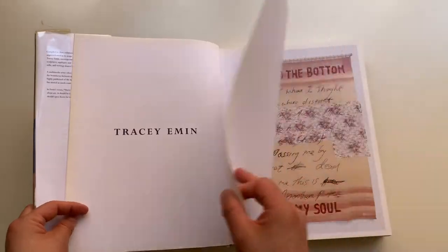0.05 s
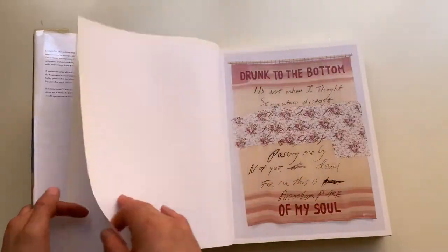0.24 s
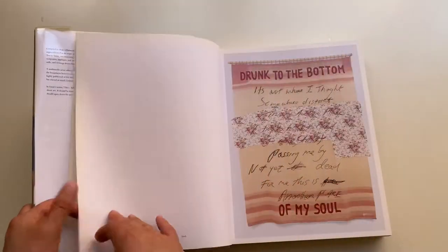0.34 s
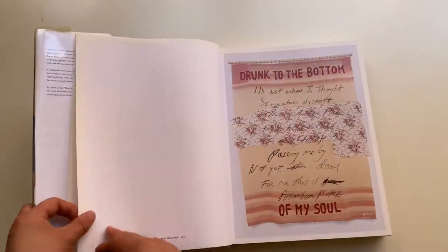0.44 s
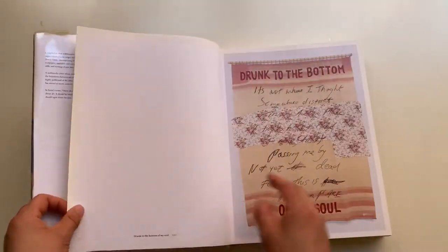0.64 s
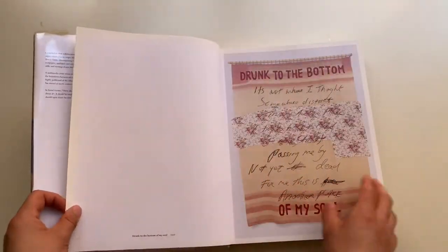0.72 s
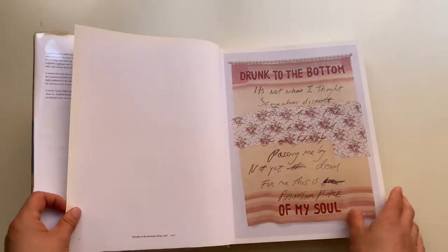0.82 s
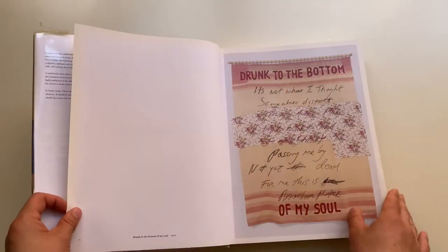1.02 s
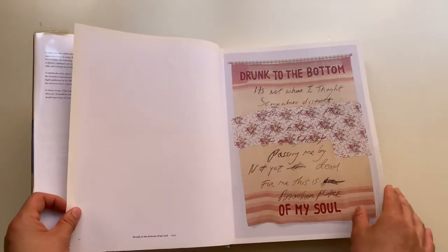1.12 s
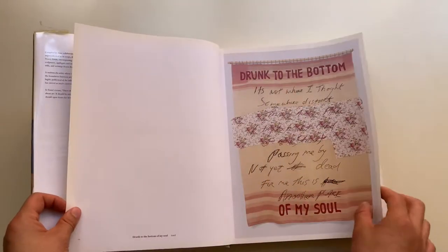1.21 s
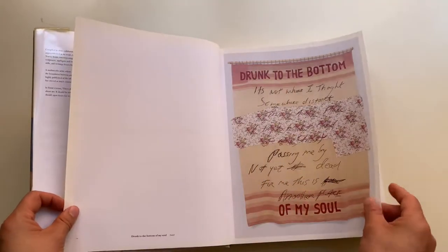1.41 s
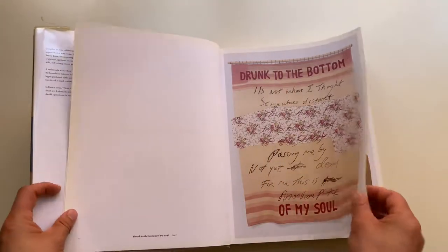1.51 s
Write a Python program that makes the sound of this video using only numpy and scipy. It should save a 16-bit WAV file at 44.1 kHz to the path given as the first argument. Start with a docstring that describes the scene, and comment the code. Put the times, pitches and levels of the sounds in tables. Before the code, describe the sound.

Page turn in a quiet room: sheet buckles, rustles over, then fingers pick at the next page

```python
"""A hand turns a large stiff page of a book in a quiet room, close to a mid-side microphone pair.
First faint sliding with a few ticks, then the sheet buckles with a hollow flop (swelling rings) at 0.2 s.
It slides and crackles on (grainy noise), ticks and thuds at 0.6 s, and fades to near silence.
From 1.27 s fingers pick at the next page: ticks, brushing treble and narrow rasps.
Throughout, filtered noise makes a low lumpy rumble, a wavering hum and a faint hiss."""
import sys
import numpy as np
from scipy import signal
from scipy.fft import rfft, irfft, next_fast_len
from scipy.io import wavfile
from scipy.ndimage import uniform_filter1d, map_coordinates

SR = 44100
rng = np.random.default_rng(int(sys.argv[2]) if len(sys.argv) > 2 else 0)


def field_ratio(decibels):
    """Amplitude ratio for a level in dB (20 dB per decade); scalars and array-likes work."""
    return 10 ** (np.asarray(decibels, dtype=float) / 20)


def inscribe(sig):
    """Save sig as 16-bit PCM at rate SR to the path in sys.argv[1].

    A 1-D sig is mono; a 2-D sig holds one channel per row.
    Samples are clipped to [-1, 1] before scaling.
    """
    pcm = np.round(np.clip(np.atleast_2d(sig).T, -1, 1) * 32767)
    wavfile.write(sys.argv[1], SR, pcm.astype(np.int16))


N = 68355


def unit(x):
    """Scaled to rms 1."""
    return x / np.sqrt(np.mean(x ** 2) + 1e-20)


def along(points, hz):
    """Interpolates (frequency [Hz], value) points on a log frequency axis."""
    point_hz, value = np.transpose(points)
    return np.interp(np.log(hz + 1), np.log(point_hz + 1), value)


def curves(rows):
    """One value per sample for each column after the time."""
    time_s, *columns = np.transpose(rows)
    return [np.interp(np.arange(N) / SR, time_s, column) for column in columns]


def wobble(knots_per_s):
    """A smooth random curve through normally distributed knots."""
    knots = rng.standard_normal(int(N * knots_per_s / SR) + 4)
    return map_coordinates(knots, [np.arange(N) * knots_per_s / SR])


def filtered(x, response):
    """x times a complex response of frequency."""
    size = next_fast_len(N + SR // 2)
    hz = np.fft.rfftfreq(size, 1 / SR)
    return irfft(rfft(x, size) * response(hz), size)[..., :N]


def coloured(x, spectrum):
    """x through a spectrum, rms 1."""
    return unit(filtered(x, lambda hz: field_ratio(along(spectrum, hz))))


# buckles of the curved sheet: (time [s], level [dB], pitch [Hz])
BUCKLES = [(0.2158, -26.5, 1470), (.2190, -29.5, 920), (0.2223, -21, 1124), (0.2257, -17, 1122),
           (0.2311, -28.5, 1440), (0.244, -45, 1150), (0.232, -37, 293), (.338, -40, 408),
           (.346, -36, 2150), (0.3545, -39.5, 914), (.358, -44, 700), (.365, -48, 371), (.599, -52, 442),
           (1.380, -47.5, 335)]
SWELL_CYCLES = 1.63  # up to the top of the swell
OVERTONE_RATIO, OVERTONE_SPREAD, OVERTONE_DB = 1.783, 0.14, -12.5


def buckle_ring(t, hz):
    """A sine that swells and dies within a few cycles."""
    swell = t * hz / SWELL_CYCLES
    return (swell * np.exp(1 - swell)) ** 4 * np.sin(2 * np.pi * hz * t)


def buckles():
    """The sheet snaps over: each buckle swells and rings, with one overtone of varying ratio."""
    out, t = np.zeros(N + SR), np.arange(SR // 20) / SR
    for start_s, level_db, hz in BUCKLES:
        overtone_hz = hz * OVERTONE_RATIO * rng.normal(1, OVERTONE_SPREAD)
        ring = buckle_ring(t, hz) + field_ratio(OVERTONE_DB) * buckle_ring(t, overtone_hz)
        out[round(start_s * SR):][:len(t)] += field_ratio(level_db) * ring
    return out[:N]


GRAINS_PER_S, GRAIN_SPREAD_DB, GRAIN_TOP_SPREADS = 2200, 2.5, 2.5
GRAIN_POWER_SHARE = 0.48


def crackle():
    """Steady noise mixed with sparse 9-sample noise grains of uneven size."""
    spreads = np.minimum(rng.exponential(size=N), GRAIN_TOP_SPREADS)
    size = (rng.random(N) < GRAINS_PER_S / SR) * field_ratio(GRAIN_SPREAD_DB * spreads)
    envelope = np.sqrt(np.abs(uniform_filter1d(size ** 2, size=9)))
    grains = unit(envelope * rng.standard_normal(N))
    steady = rng.standard_normal(N)
    return np.sqrt(GRAIN_POWER_SHARE) * grains + np.sqrt(1 - GRAIN_POWER_SHARE) * steady


# sliding of paper and skin:
# (time [s], level [dB], hollow body re level [dB], fine treble re level [dB])
SLIDE = [(0, -83.5, 13, -7), (.085, -66, 4.5, 0), (.11, -70.5, 5, -5), (.15, -61.5, -1, -12.5),
         (.195, -65.5, -2, -8.5), (.212, -56.5, 11, -4), (.226, -47.5, 1, -13.5), (.27, -58, 5, -6.5),
         (.325, -50.5, -5.5, -11), (.36, -52, 6, -13), (.425, -56.5, -4.5, -10), (.442, -64.5, 3, -6),
         (.54, -63.5, 0.5, -26), (.63, -73.5, 5, -9), (.69, -69, -6, 5), (.745, -74, -3.5, -16),
         (.855, -76.5, 6.5, -11), (.91, -91, 6.5, -3), (1.265, -80.5, 3.5, -10.5), (1.28, -71, 8.5, 4),
         (1.305, -79.5, 4.5, -31), (1.365, -79.5, 6.5, -37), (1.378, -76, 13, 0.5), (1.415, -71.5, 12, 5),
         (1.442, -80, 14, -13), (1.447, -66.5, 1, -15), (1.48, -64, 6.5, 9), (1.55, -67, 2, -20)]
# spectra of friction, curved sheet and brushing skin: (frequency [Hz], relative density [dB per Hz])
SLIDE_COLOUR = [(300, -16), (1300, -3.5), (2400, -4), (4200, -7), (5000, -14.5), (7000, -17.5),
                (11000, -40.5)]
BODY_COLOUR = [(90, -7.5), (220, 0.5), (550, -4), (750, -3), (1300, -10.5), (2500, -21.5), (5000, -58.5)]
TREBLE_COLOUR = [(3000, -31), (6000, -9), (11500, -9.5), (15700, -13.5)]


def slide():
    """Crackling friction, a duller body where the sheet is curved, fine treble where skin brushes it."""
    level_db, body_db, treble_db = curves(SLIDE)
    fizz = field_ratio(2.44 * wobble(50.23)) * coloured(crackle(), SLIDE_COLOUR)
    body = field_ratio(body_db + 1.3 * wobble(80)) * coloured(crackle(), BODY_COLOUR)
    treble = field_ratio(treble_db + 0.5 * wobble(72)) * coloured(crackle(), TREBLE_COLOUR)
    return field_ratio(level_db) * (fizz + body + treble)


# crisp ticks of the paper: (time [s], level [dB], pitch [Hz], noise re ring [dB])
TICKS = [(0.0203, -39, 805, -15), (0.0796, -38.5, 1090, -7.5), (0.125, -39.5, 1950, -3),
         (0.281, -35.5, 2330, -39), (0.331, -24.5, 2183, -9), (0.54, -40, 1010, -21),
         (.598, -41, 1010, -20), (1.274, -53, 1010, 2.5), (1.374, -46, 1270, -14.5),
         (1.4545, -37, 896, -3.5), (1.478, -37.5, 1820, 0)]
TICK_RING_T60_S, TICK_NOISE_T60_S, TICK_RISE_S = 0.008, 0.019, 0.00051
TICK_HIGHPASS_HZ, TICK_LOWPASS_HZ = 600, 5600


def tick_response(hz):
    """First-order high-pass and low-pass."""
    highpass = 1j * hz / (TICK_HIGHPASS_HZ + 1j * hz)
    return highpass / (1 + 1j * hz / TICK_LOWPASS_HZ)


def ticks():
    """A very short ring of two partials and a burst of noise."""
    out, t = np.zeros(N + SR), np.arange(SR // 16) / SR
    rise = 1 - np.exp(-t / TICK_RISE_S)
    for start_s, level_db, hz, noise_db in TICKS:
        burst = field_ratio(noise_db - 60 * t / TICK_NOISE_T60_S) * rng.standard_normal(len(t))
        partials = np.sin(2 * np.pi * hz * t) + 0.5 * np.sin(2 * np.pi * 1.3 * hz * t)
        tone = field_ratio(-60 * t / TICK_RING_T60_S) * partials
        out[round(start_s * SR):][:len(t)] += field_ratio(level_db) * rise * (tone + burst)
    return filtered(out[:N], tick_response)


# scrapes of a fingertip, a page edge or creasing fibres:
# (time [s], length [s], level [dB], pitch [Hz])
SCRAPES = [(.2145, .018, -41, 2100), (.214, .017, -51.5, 3560), (.538, .013, -56.5, 1760),
           (.366, 0.019, -65, 4200), (0.65, .05, -68.5, 3570), (0.663, 0.041, -67.5, 2480),
           (1.374, .016, -67, 2100), (1.392, 0.029, -68, 3950), (1.449, 0.029, -59, 2500),
           (1.476, 0.0065, -50, 6600)]
SCRAPE_LOG_WIDTH = 0.17


def scrapes():
    """Grainy noise in one resonance, swelling and fading."""
    out, t = np.zeros(N), np.arange(N) / SR
    for start_s, length_s, level_db, pitch_hz in SCRAPES:
        def resonance(hz):
            return np.exp(-(np.log((hz + 1) / pitch_hz) / SCRAPE_LOG_WIDTH) ** 2)
        rasp = unit(filtered(crackle(), resonance))
        progress = np.clip((t - start_s) / length_s, 0, 1)
        out += field_ratio(level_db) * np.sqrt(np.abs(np.sin(np.pi * progress))) * rasp
    return out


# soft thuds of hand and sheet through the table: (time [s], level [dB], pitch [Hz])
THUDS = [(0.236, -50, 65), (0.348, -53.5, 62), (0.595, -55.5, 112), (0.986, -62.5, 51.7), (1.377, -58, 61),
         (1.431, -57, 74.5)]
THUD_RISE_S = 0.0071


def thuds():
    """A low sine under a soft swell."""
    out, t = np.zeros(N + SR), np.arange(SR // 5) / SR
    swell = t / THUD_RISE_S * np.exp(1 - t / THUD_RISE_S)
    for start_s, level_db, hz in THUDS:
        out[round(start_s * SR):][:len(t)] += field_ratio(level_db) * swell * np.sin(2 * np.pi * hz * t)
    return out[:N]


# decay of the room: (frequency [Hz], T60 [s])
ROOM_T60 = [(200, 0.28), (8000, 0.27)]
ROOM_DB, ROOM_DELAY_SAMPLES = -12.5, 150


def room(x):
    """Mid and side noise tails that die at nearly the same speed at all frequencies."""
    hz, t, z = signal.stft(rng.standard_normal((2, SR // 2)), SR, nperseg=256)
    decay = field_ratio(-60 * t / along(ROOM_T60, hz)[:, None])
    tail = signal.istft(z * decay, SR, nperseg=256)[1]
    tail = tail / np.linalg.norm(tail[0])
    delayed = np.pad(x, (ROOM_DELAY_SAMPLES, 0))
    return field_ratio(ROOM_DB) * signal.fftconvolve(delayed[None], tail, axes=1)[:, :N]


# wavering hum: (time [s], level [dB])
HUM = [(0, -64.5), (.62, -76.5), (.85, -71), (1, -89), (1.2, -68.5), (1.32, -63), (1.36, -78.5),
       (1.55, -68.5)]
HUM_HZ, HUM_WIDTH_HZ, HUM_SIDE_GAIN = 125, 14, 0.46


def hum():
    """Narrow-band noise with a moving level, weaker in the side."""
    band = filtered(rng.standard_normal(N), lambda hz: np.exp(-((hz - HUM_HZ) / HUM_WIDTH_HZ) ** 2))
    mid = field_ratio(curves(HUM)[0]) * unit(band)
    return np.array([mid, HUM_SIDE_GAIN * mid])


RUMBLE_DB, RUMBLE_HZ, RUMBLE_LOG_WIDTH = -72.5, 56, 0.29


def rumble():
    """Low noise, lumpy because its band is narrow."""
    noise = rng.standard_normal(N)
    band = filtered(noise, lambda hz: np.exp(-(np.log((hz + 1) / RUMBLE_HZ) / RUMBLE_LOG_WIDTH) ** 2))
    return field_ratio(RUMBLE_DB) * unit(band)


# spectra of the noise floor: (frequency [Hz], relative density [dB per Hz])
FLOOR_MID = [(25, -30.5), (40, -13), (170, -13.5), (270, -28), (520, -36.5), (1000, -47.5), (1280, -33),
             (1600, -47), (7500, -61), (9500, -93.5)]
FLOOR_SIDE = [(30, -43), (190, -9), (240, -13.5), (1200, -16), (1600, -28.5), (3300, -30.5), (5500, -46),
              (15700, -55)]
FLOOR_DB, FLOOR_SIDE_RE_MID_DB = -69, -3.5


def noise_floor():
    """Independent steady noises in mid and side: mostly low, with faint hiss above."""
    mid = coloured(rng.standard_normal(N), FLOOR_MID)
    side = field_ratio(FLOOR_SIDE_RE_MID_DB) * coloured(rng.standard_normal(N), FLOOR_SIDE)
    return field_ratio(FLOOR_DB) * np.array([mid, side])


# mid and side colour: (frequency [Hz], gain [dB]); the mid has a deep dip at 8-12 kHz
MID_COLOUR = [(6500, -1.5), (7800, -9.5), (8600, -16), (11300, -21), (12200, -11), (15700, -6)]
SIDE_COLOUR = [(100, -13), (300, -12), (700, -5), (2400, -7.5), (4400, -2), (8000, 1), (15700, -8.5)]
# phase lead of side over mid: (frequency [Hz], lead [rad])
SIDE_LEAD = [(300, 0.86), (1000, 1.69)]


def colour_mid_side(mid, side):
    """Mid and side each get a gain curve; the side also gets a phase lead."""
    mid = filtered(mid, lambda hz: field_ratio(along(MID_COLOUR, hz)))
    side = filtered(side, lambda hz: field_ratio(along(SIDE_COLOUR, hz)) * np.exp(1j * along(SIDE_LEAD, hz)))
    return np.array([mid, side])


def scene():
    """Paper in mid and side over the background, decoded to left and right."""
    paper = buckles() + slide() + ticks() + scrapes()
    mid, side = colour_mid_side(*(paper + room(paper))) + hum() + noise_floor()
    mid = mid + thuds() + rumble()
    return np.array([mid + side, mid - side])


def roll_off(x):
    """The treble ends steeply here."""
    return signal.sosfilt(signal.butter(12, 15710, fs=SR, output="sos"), x)


def record(dry):
    """Cuts everything above 15.7 kHz."""
    mix = filtered(dry, lambda hz: hz < 15720)
    return roll_off(mix)


dry = scene()
out = record(dry)
inscribe(out)
```